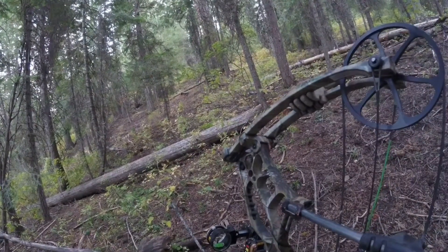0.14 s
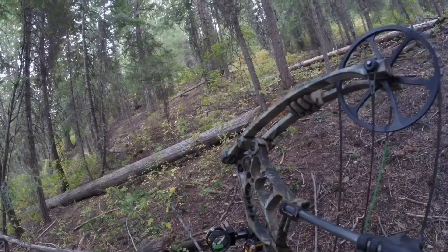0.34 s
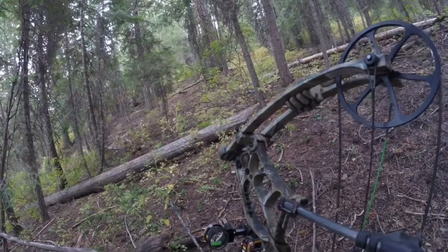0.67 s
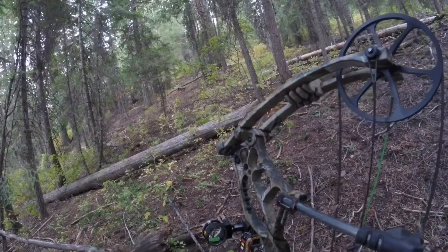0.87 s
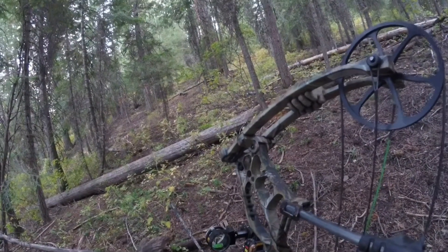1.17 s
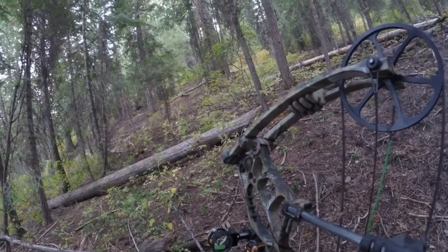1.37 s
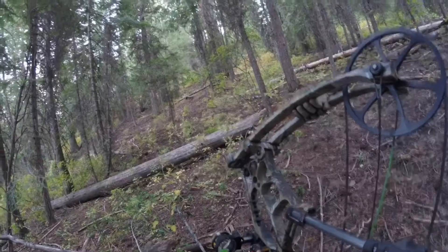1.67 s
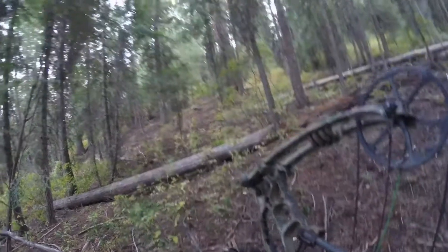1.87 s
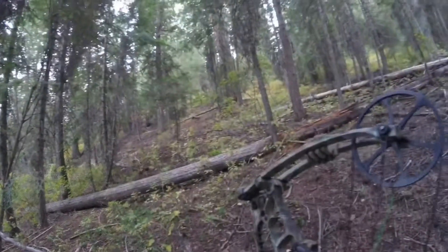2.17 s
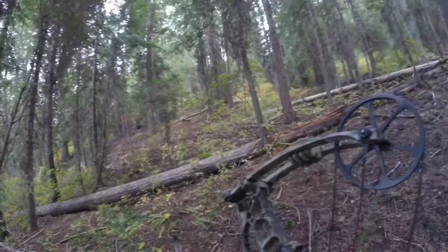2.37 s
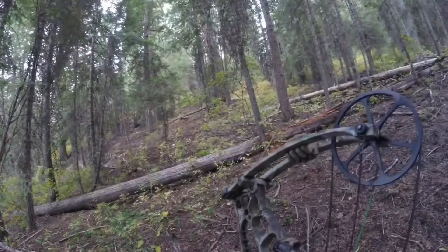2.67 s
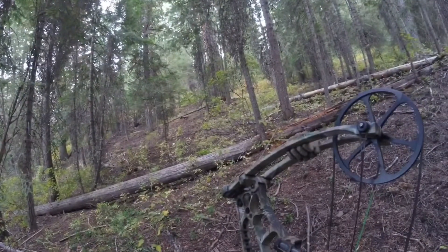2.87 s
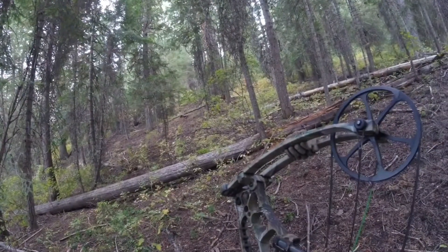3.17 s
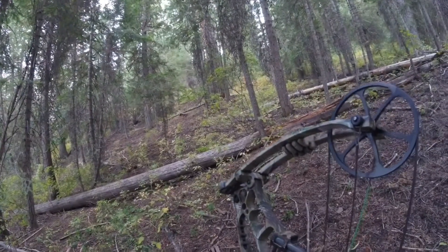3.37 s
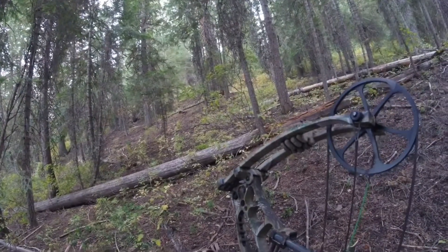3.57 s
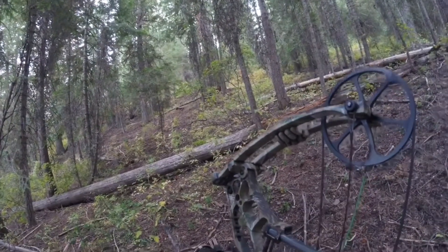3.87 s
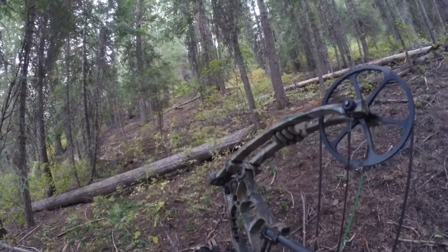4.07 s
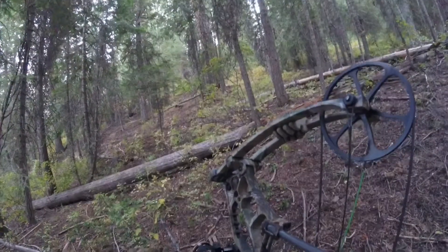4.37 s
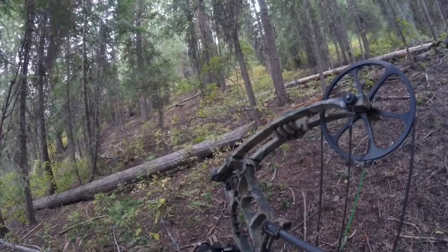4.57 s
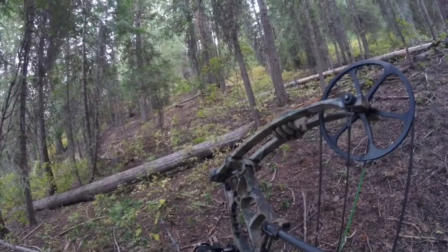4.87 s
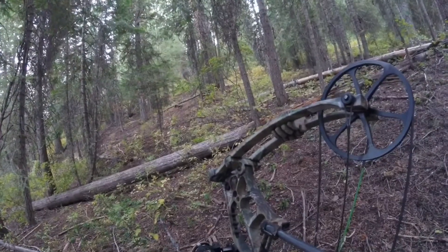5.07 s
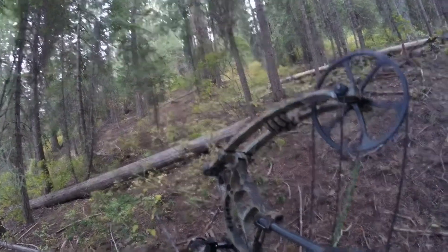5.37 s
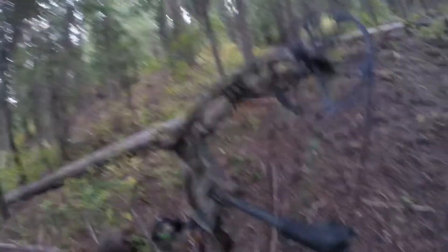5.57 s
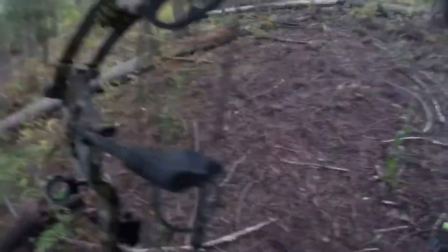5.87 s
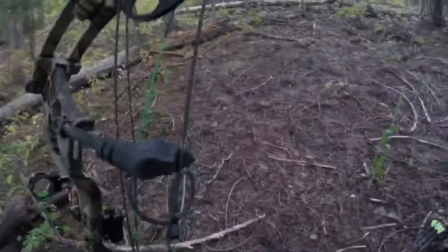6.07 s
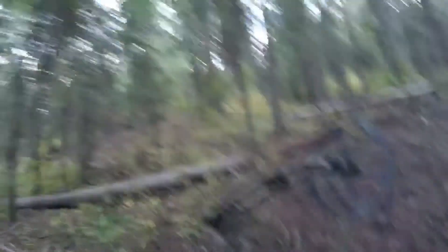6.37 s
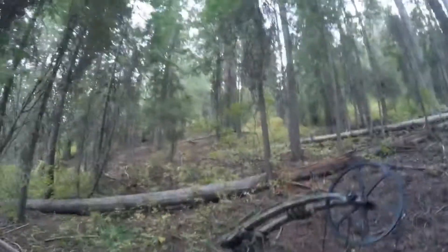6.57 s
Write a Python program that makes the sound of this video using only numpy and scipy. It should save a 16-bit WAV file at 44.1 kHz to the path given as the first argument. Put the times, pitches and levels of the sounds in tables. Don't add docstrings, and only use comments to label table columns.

```python
import sys
import numpy as np
from scipy import signal
from scipy.fft import rfft, irfft, next_fast_len
from scipy.io import wavfile
from scipy.ndimage import uniform_filter1d, map_coordinates

SR = 44100
rng = np.random.default_rng(int(sys.argv[2]) if len(sys.argv) > 2 else 0)


def waveform_to_disk(signal):
    frames = np.transpose(np.atleast_2d(signal))
    scaled = np.clip(frames, -1, 1) * 32767
    samples = np.round(scaled).astype(np.int16)
    wavfile.write(sys.argv[1], SR, samples)


def field_ratio(decibels):
    return 10 ** (np.asarray(decibels, dtype=float) / 20)


N = 296609


def unit(x):
    return x / np.sqrt(np.mean(x ** 2) + 1e-20)


def along(points, hz):
    f, value = np.transpose(points)
    return np.interp(np.log(hz + 1), np.log(f + 1), value)


def filtered(x, response):
    m = next_fast_len(len(x) + SR // 4)
    spectrum = rfft(x, m) * response(np.fft.rfftfreq(m, 1 / SR))
    return irfft(spectrum, m)[:len(x)]


def noise_coloured(points):
    return unit(filtered(rng.standard_normal(N), lambda f: field_ratio(along(points, f))))


def resonance(f, hz, width):
    return 1j * f * width / (hz * hz - f * f + 1j * f * width)


def causal(points, hz):
    grid = np.fft.rfftfreq(4096, 1 / SR)
    cepstrum = irfft(np.log(field_ratio(along(points, grid))))
    cepstrum = cepstrum * np.r_[1, 2 * np.ones(len(grid) - 2), 1, np.zeros(len(grid) - 2)]
    log_gain = rfft(cepstrum)
    return np.exp(np.interp(hz, grid, log_gain.real) + 1j * np.interp(hz, grid, log_gain.imag))


def wobble(length, rate):
    knots = rng.standard_normal(int(length * rate / SR) + 4)
    return map_coordinates(knots, [np.arange(length) * rate / SR])


def stretch(rows, smooth_s):
    s, *columns = np.transpose(rows)
    start = max(round(s[0] * SR), 0)
    t = np.arange(start, round(s[-1] * SR)) / SR

    def rounded(v):
        return uniform_filter1d(v, int(smooth_s * SR), mode="nearest")

    return start, [rounded(rounded(np.interp(t, s, c))) for c in columns]


def add(track, start, x):
    track[start:start + len(x)] += x[:max(len(track) - start, 0)]


def fade(length, seconds):
    n = np.arange(length)
    return np.clip(np.minimum(n, n[::-1]) / (seconds * SR), 0, 1)


def echo(x, decays):
    out, block = np.zeros(N), SR // 11
    noise = rng.standard_normal((N // block + 1, SR // 2))
    hz, t, z = signal.stft(noise, SR, nperseg=256)
    decay = field_ratio(-60 * t / along(decays, hz)[:, None])
    tails = signal.istft(z * decay, SR, nperseg=256)[1]
    for start, tail in zip(range(0, N, block), tails):
        tail = tail / np.linalg.norm(tail)
        add(out, start, signal.fftconvolve(x[start:start + block], tail))
    return out


# (frequency [Hz], density [dB per Hz])
HISS_COLOUR = [(2650, -76), (4500, -17.5), (5910, -8.5), (6600, -0.5), (7920, -2.5), (9030, -3),
               (11300, -9), (15000, -15)]


def microphone_hiss():
    return field_ratio(-75) * noise_coloured(HISS_COLOUR)


# (frequency [Hz], density [dB per Hz])
AIR_COLOUR = [(79, -36), (135, -2), (216, -4.5), (334, -9.5), (439, -12), (1140, -17.5), (2110, -23),
              (2310, -24), (2610, -25), (5000, -42), (6500, -64.5), (11000, -120)]
# (time [s], level [dB])
BREEZE = [(0, -68), (1.4, -67.5), (3.05, -66.5), (3.65, -70), (4.1, -66.5), (5.0, -67.5), (5.7, -64),
          (6.73, -67.5)]


def forest_air():
    s, db = np.transpose(BREEZE)
    breeze_db = np.interp(np.arange(N) / SR, s, db) + 2.5
    lumps_db = 0.57 * wobble(N, 6)
    return noise_coloured(AIR_COLOUR) * field_ratio(breeze_db + lumps_db)


# (time [s], peak level [dB], centre [Hz], width [Hz])
GEAR_TICKS = [(1.823, -69.5, 3050, 250), (3.148, -70.5, 3000, 202), (5.518, -53, 173, 148.5),
              (5.651, -45, 500, 900), (5.618, -46, 474, 300), (5.676, -57, 500, 900),
              (5.87, -67, 4840, 602), (5.985, -49.5, 3530, 2460), (5.985, -41.5, 1000, 1200),
              (6.019, -60, 1920, 1500), (6.043, -53.5, 3580, 2400), (6.044, -51, 1600, 1500),
              (6.171, -48.5, 154, 99), (6.293, -66, 2510, 200)]


def gear_ticks():
    out, t = np.zeros(N), np.arange(SR // 12) / SR
    for s, db, hz, width in GEAR_TICKS:
        decay_s = .011 + 6 / width
        spit = rng.standard_normal(len(t)) * field_ratio(-60 * t / decay_s)
        spit = filtered(spit, lambda f: resonance(f, hz, width) ** 2 / (1 + (f / 6000) ** 6))
        add(out, round(s * SR), field_ratio(db) * spit / np.abs(spit).max())
    return out


# (time [s], pitch [Hz], level [dB])
BUGLE_GLIDES = [
    [(1.07, 626, -76), (1.19, 777, -67), (1.3, 1000, -75), (1.45, 1336, -88), (1.7, 1645, -67),
     (1.82, 1765, -77), (1.97, 1800, -83)],
    [(1.92, 2238, -67), (2.15, 2270, -87), (2.35, 2360, -78), (2.6, 2310, -87), (2.74, 2290, -63),
     (2.8, 2190, -71.5), (2.9, 1930, -83)],
]
# (time [s], length [s], pitch [Hz], start level
# [dB], fall [dB])
SIDE_WHISTLES = [
    (1.409, 0.23, 1265, -65, 24),
    (2.55, 0.34, 837, -69.5, 4),
    (2.768, 0.18, 708.6, -65.5, 4),
    (4.882, 0.29, 1587, -63, 32),
]


def bugle():
    out = np.zeros(N)
    sides = [[(s, hz, db), (s + length, hz, db - fall_db)] for s, length, hz, db, fall_db in SIDE_WHISTLES]
    for rows in BUGLE_GLIDES + sides:
        start, (hz, db) = stretch(rows, 0.042)
        length = len(hz)
        phase = 2 * np.pi * np.cumsum(hz * (1 + 0.005 * wobble(length, 40))) / SR
        flutter = field_ratio(2.2 * wobble(length, 30))
        octave = field_ratio(-93 + 0.23 * (db - db.min())) * (hz.min() > 1830)
        octave = octave * field_ratio(3 * wobble(length, 12))
        whistle = field_ratio(db) * flutter * np.sin(phase) + octave * np.sin(2 * phase)
        add(out, start, whistle * fade(length, 0.025))
    return out


def yelp(start_hz, end_hz, seconds, rough):
    u = np.linspace(0, 1, int(seconds * SR))
    phase = 2 * np.pi * np.cumsum(start_hz + (end_hz - start_hz) * u ** .85) / SR
    tone = np.sin(phase) + 0.25 * np.sin(2 * phase) + rough * rng.standard_normal(len(u))
    return tone * np.clip(u / 0.037, 0, 1) * np.clip((1 - u) / 0.14, 0, 1)


# (time [s], level [dB])
CHUCKLE_YELPS = [(4.232, -58), (4.545, -58.5), (4.897, -57.5), (5.225, -57.5), (5.575, -58), (5.932, -56.5),
                 (6.28, -55.5), (6.62, -58.5)]
# (time [s], level [dB])
CHUCKLE_HOOTS = [(4.436, -58), (4.75, -58.5), (5.108, -56.5), (5.445, -59.5), (5.797, -60.5), (6.157, -59),
                 (6.522, -57.5)]
# (time [s], level [dB])
BULL_GRUNTS = [
    (2.962, -55.5),
    (3.07, -74),
]
# (frequency [Hz], width [Hz], level [dB])
BULL_THROAT = [(412, 37, 3), (577, 44, -1), (1070, 37, -2), (1320, 81, -11)]


def chuckle():
    voice, grunts = np.zeros(N), np.zeros(N)
    for s, db in CHUCKLE_YELPS:
        add(voice, round(s * SR), field_ratio(db + 11) * yelp(1450, 380, 0.05, rough=0.66))
    for s, db in CHUCKLE_HOOTS:
        add(voice, round(s * SR), field_ratio(db + 7) * yelp(573.0, 642.7, 0.0327, rough=1.0))
    for s, db in BULL_GRUNTS:
        add(grunts, round(s * SR), field_ratio(db) * yelp(1000, 640, .07, rough=1.3))

    def bull_throat(f):
        return 0.25 * (f < 1500) + sum(field_ratio(db) * resonance(f, hz, width) for hz, width, db in BULL_THROAT)

    def grunt_band(f):
        return 1 / (1 + (f / 1250) ** 8) / (1 + (550 / (f + 1)) ** 8)

    return filtered(voice, bull_throat) + filtered(grunts, grunt_band)


def pocket(f, hz, lift, zero_width, pole_width):
    swallowed = hz * hz - f * f + 1j * f * zero_width
    return swallowed / ((hz * lift) ** 2 - f * f + 1j * f * pole_width)


# (frequency [Hz], level [dB])
MEW_THROAT = [(150, -18.5), (500, 5), (900, -6.5), (1450, 2.5), (2000, 1.5), (2800, 0), (3500, -3),
              (4300, -11.5), (5200, -11.5), (6400, -17), (7500, -24.5), (9500, -24.5), (10800, -29),
              (11800, -39)]
# (frequency [Hz], width [Hz])
CASING_DIPS = [(7150, 460), (8600, 480), (10100, 400)]


def throat_and_casing(f, lowest_hz, upper_hz, top_hz):
    response = causal(MEW_THROAT, f) * pocket(f, lowest_hz, 1.076, 40, 720)
    response = response * pocket(f, upper_hz, 0.98, 58.7, 270) * pocket(f, top_hz, 1.047, 40, 500)
    return response * np.prod([pocket(f, hz, 1.009, 0.2 * width, width) for hz, width in CASING_DIPS], axis=0)


# (time [s], pitch [Hz], effort as level of the overtones [dB])
MEW_GLIDES = [
    [(0, 506.3, -33.5), (.03, 465.7, -36.5), (.06, 427.6, -38), (.078, 390.2, -41.5), (.094, 333, -45.5),
     (.108, 274, -70)],
    [(.722, 687.4, -33.5), (.735, 707.2, -34.5), (.765, 724.5, -33), (.8, 735.3, -33.5),
     (.83, 722.6, -34.5), (.858, 677.6, -36), (.888, 565, -36.5), (.922, 370, -44), (.935, 303, -68.5)],
    [(3.719, 1108, -36.5), (3.76, 1096, -34.5), (3.795, 1063, -34.5), (3.87, 815, -30.5),
     (3.95, 666.7, -32), (4.0, 614.7, -30), (4.027, 550, -32), (4.056, 389.5, -36.5), (4.073, 226.6, -57.5)],
    [(5.424, 1016, -38), (5.455, 1083, -42), (5.48, 1116, -34.5), (5.5, 1089, -39), (5.52, 966, -31),
     (5.54, 774.4, -32), (5.58, 459.3, -34.5), (5.596, 318, -46), (5.604, 261, -67)],
]
# (lowest at the start [Hz], lowest at the end [Hz], upper [Hz], top [Hz])
THROAT_POCKETS = [(2240, 2400, 4300, 6260), (2190, 2300, 4800, 6600), (2405, 2305, 4410, 5900),
                  (2455, 2270, 4490, 5930)]
MEW_MANNER = [(1.0, 1.18, .1), (0.72, .9, 1.8), (1.1, 0.56, 14), (.99, 0.7, 5.7)]
# (frequency [Hz], level [dB])
CHEST_COLOUR = [(200, -5.5), (270, 9.5), (330, 8), (420, 7.5), (500, -3), (550, -5.5), (650, -1),
                (1100, 0.5)]
# (delay [ms], level [gain])
NEAR_BOUNCES = [(1.43, 0.19), (2.35, 0.037), (3.699, 0.08)]


def bounces(f):
    return 1 + sum(gain * np.exp(-2j * np.pi * f * ms / 1e3) for ms, gain in NEAR_BOUNCES)


def mews():
    attack_s, attack_db, whisper_s, whisper_db = .007, 26, .012, 49
    release_s, release_db, release_sag = 0.011, 70, 0.87
    out = np.zeros(N)
    k = np.arange(2, 50)[:, None]
    for rows, pockets, (scoop, softness, gentle) in zip(MEW_GLIDES, THROAT_POCKETS, MEW_MANNER):
        (s0, hz0, db0), (s1, hz1, db1) = rows[0], rows[-1]
        whisper = (s0 - attack_s - whisper_s, hz0 * scoop, db0 - attack_db - whisper_db)
        attack = (s0 - attack_s, hz0 * scoop ** .3, db0 - attack_db)
        release = (s1 + release_s, hz1 * release_sag, db1 - release_db)
        whole = [whisper, attack, *rows, release]
        start, (hz, _) = stretch(whole, 0.0082)
        high_db = stretch(whole, 0.00078)[1][1]
        length = len(hz)

        low_db = -35 + 0.32 * (high_db + 32.5) + along(CHEST_COLOUR, hz)

        onset = gentle * np.exp(-np.arange(length) / SR / 0.025) * (start > 0)
        soft_db = softness * 2 * (hz / 741) ** 2.66 * (1 + onset)
        slack = np.clip(-np.gradient(np.log(hz)) * SR / 9, 0, 1)
        loss_db = 27 * np.tanh(np.abs(soft_db + .6 * slack) * np.maximum(k - 3, 0) / 27)

        lowest_hz = np.linspace(pockets[0], pockets[1], length)
        hz = hz * (1 + (.0008 + 0.0092 * slack) * wobble(length, 120))
        phase = 2 * np.pi * np.cumsum(hz) / SR
        f = k * hz
        shimmer_db = f / 3500 * np.array([wobble(length, 60) for _ in k])
        source = field_ratio(high_db + 5.0 - loss_db + shimmer_db) * (f < SR / 2.5)
        throat = throat_and_casing(f, lowest_hz, pockets[2], pockets[3])
        overtones = (source * throat * np.exp(1j * (k * phase + 0.39))).real.sum(axis=0)
        fundamental = field_ratio(low_db + 3.5) * np.cos(phase - .6)

        puffs = rng.standard_normal(length) * (1 + 0.35 * np.cos(phase)) * (.008 + 0.15 * slack)
        breath = field_ratio(high_db) * filtered(puffs, lambda g: causal(MEW_THROAT, g))
        voice = (overtones + breath + fundamental) * fade(length, 0.00075)
        add(out, start, filtered(np.pad(voice, (0, 300)), bounces))
    return out


def folded(x):
    fold_hz = 12000
    below = filtered(x, lambda f: 1 / (1 + (f / (.975 * fold_hz)) ** 80))
    mirror = 2 * below * np.cos(4 * np.pi * fold_hz * np.arange(N) / SR)
    image = filtered(mirror, lambda f: (f > fold_hz) * field_ratio(-(f - 12950) ** 2 / 5e4))
    return below + field_ratio(-17) * image


# (frequency [Hz], level [dB])
BEHIND_COLOUR = [(300, 0), (1200, -5.5), (2300, 5.5), (3000, -5.5), (4000, 2.5), (6000, 18.5), (10000, -3)]
# (frequency [Hz], decay by 60 dB [s])
NEAR_TRUNKS = [(300, 0.23), (1000, 0.66), (2000, 0.48), (3000, 0.57), (5000, 0.16), (10000, 0.11)]
# (frequency [Hz], decay by 60 dB [s])
FAR_TRUNKS = [(300, 0.25), (1000, 0.65), (2000, 0.91), (3500, 0.28), (10000, 0.15)]


def scene():
    background = forest_air() + microphone_hiss() + gear_ticks()
    whistles, chuckles, calls = bugle(), chuckle(), mews()
    far_echo = echo(.5 * chuckles + 0.48 * whistles, FAR_TRUNKS)
    far_calls = 0.62 * chuckles + 0.83 * whistles + far_echo
    sent_back = filtered(calls, lambda f: field_ratio(along(BEHIND_COLOUR, f)))
    mono = background + far_calls + folded(calls) + field_ratio(-31) * echo(sent_back, NEAR_TRUNKS)
    return np.array([mono, mono])


def band_limit(x):
    return signal.sosfilt(signal.butter(12, 15180, fs=SR, output="sos"), x)


def record(dry):
    noise = rng.standard_normal(N)
    rumble = unit(filtered(noise, lambda f: (1 + (f / 70) ** 2) / (1 + (f / 115) ** 10)))
    mono = filtered(dry[0], lambda f: 1 / (1 + (128 / (f + 1)) ** 16)) + field_ratio(-91.5) * rumble
    return band_limit(np.array([mono, mono]))


dry = scene()
out = record(dry)
waveform_to_disk(out)
```